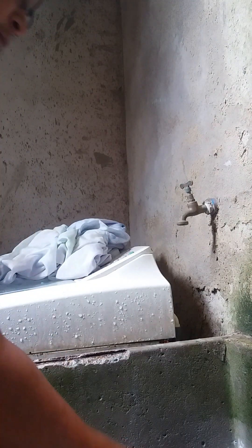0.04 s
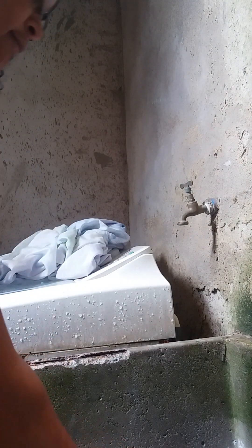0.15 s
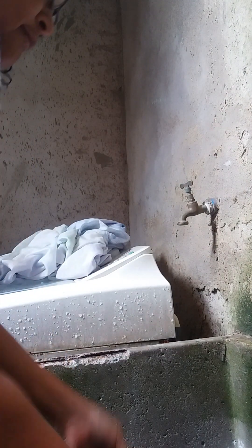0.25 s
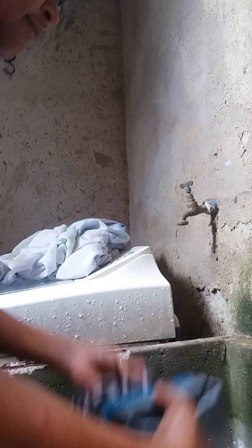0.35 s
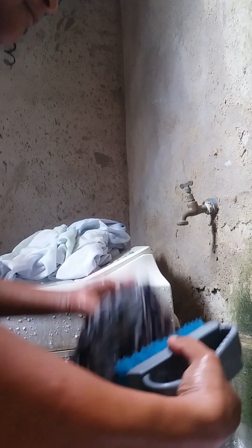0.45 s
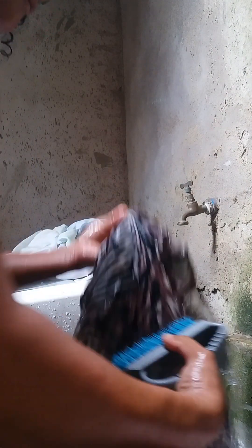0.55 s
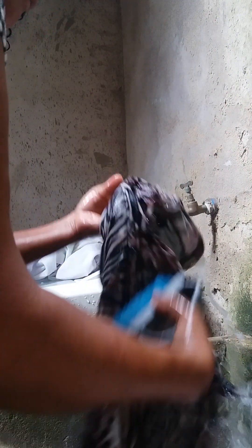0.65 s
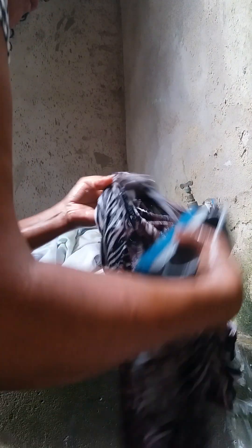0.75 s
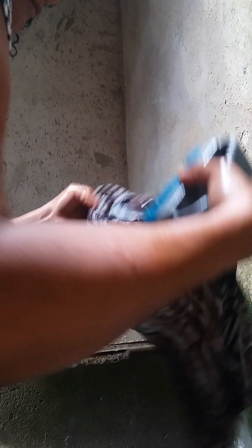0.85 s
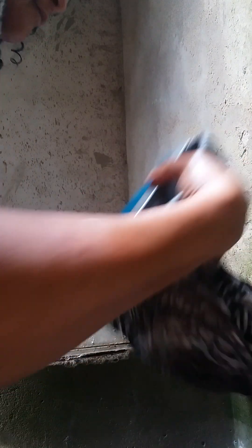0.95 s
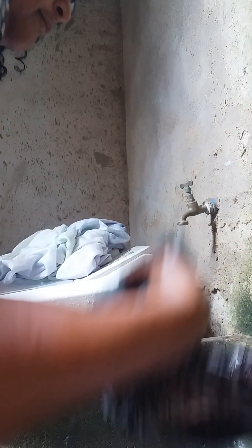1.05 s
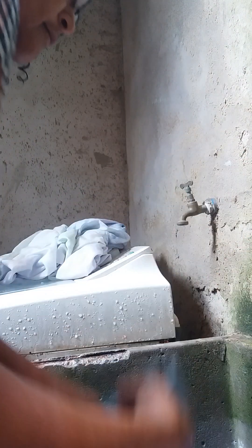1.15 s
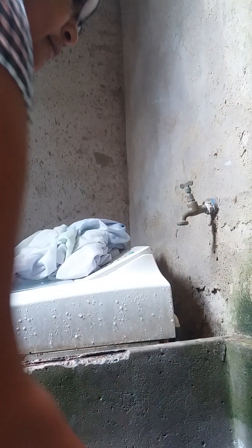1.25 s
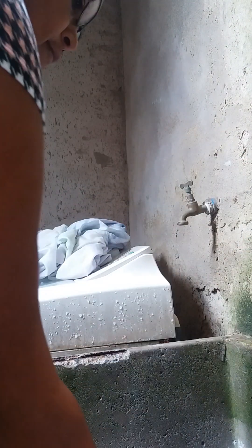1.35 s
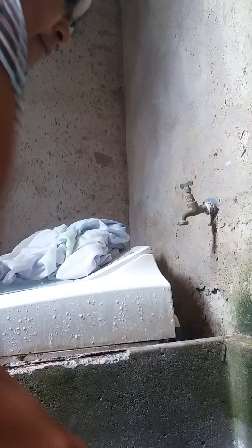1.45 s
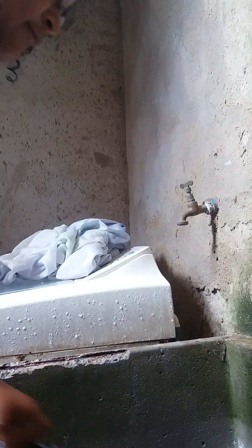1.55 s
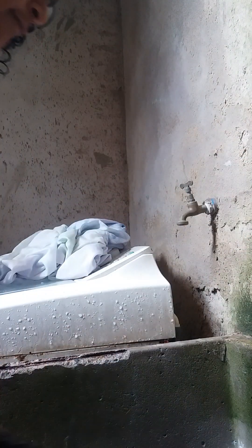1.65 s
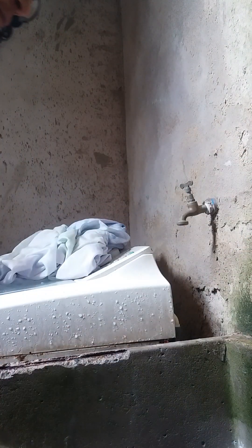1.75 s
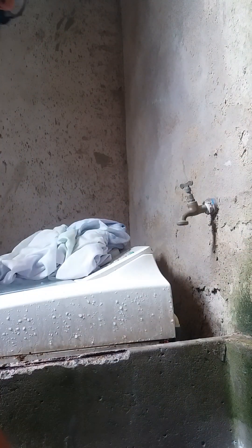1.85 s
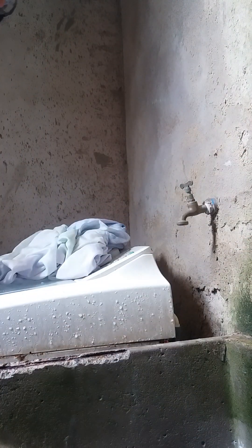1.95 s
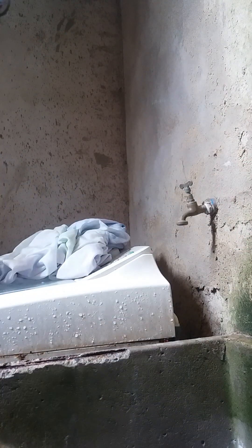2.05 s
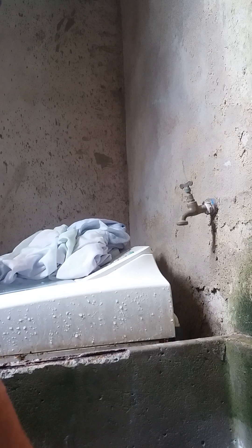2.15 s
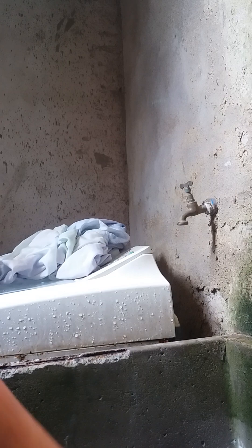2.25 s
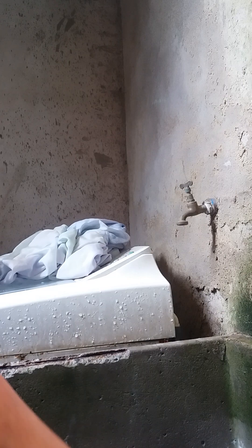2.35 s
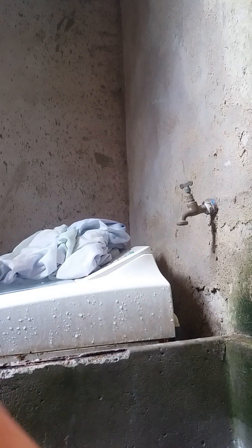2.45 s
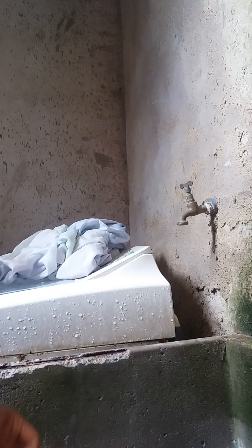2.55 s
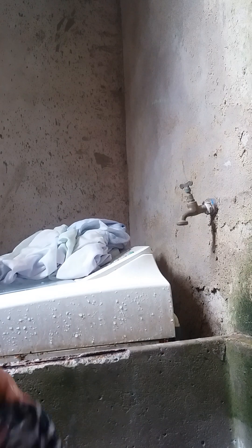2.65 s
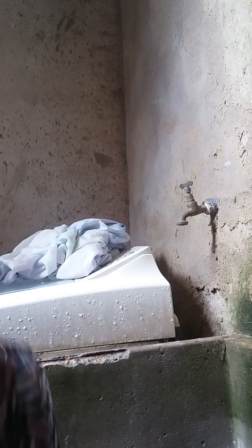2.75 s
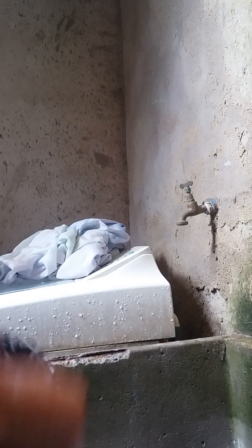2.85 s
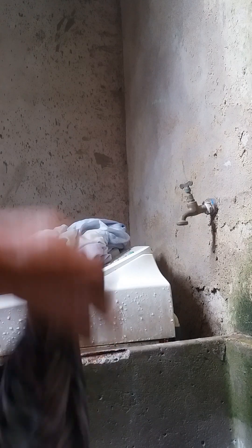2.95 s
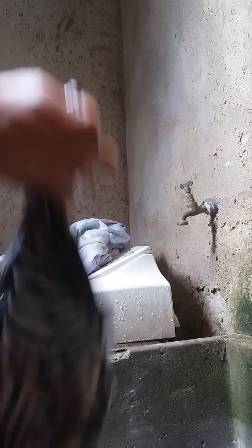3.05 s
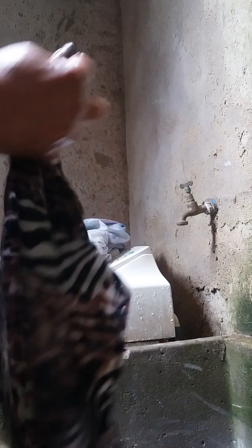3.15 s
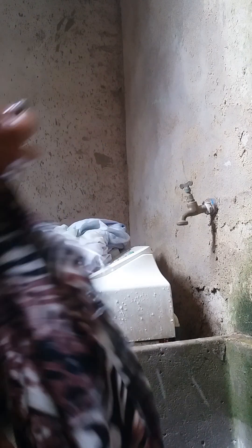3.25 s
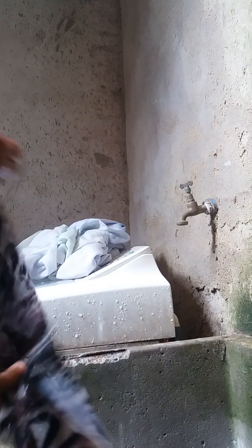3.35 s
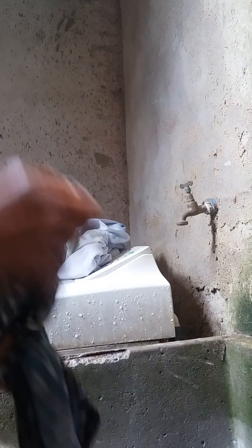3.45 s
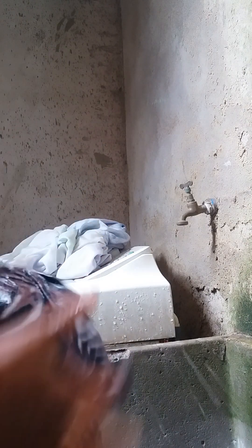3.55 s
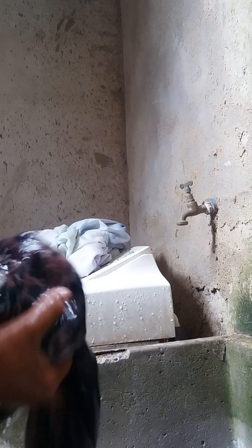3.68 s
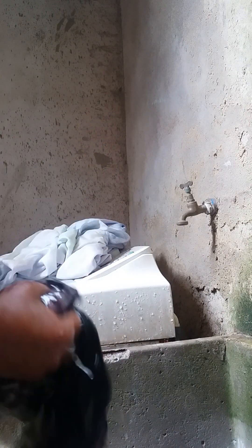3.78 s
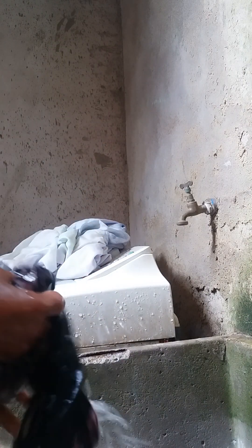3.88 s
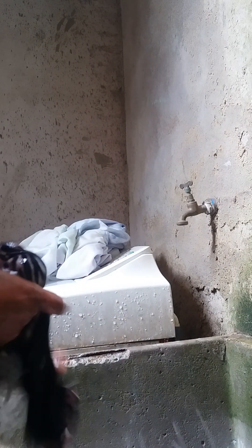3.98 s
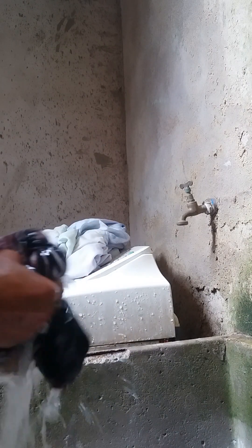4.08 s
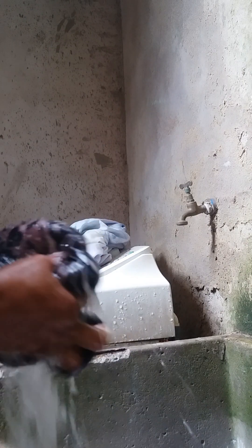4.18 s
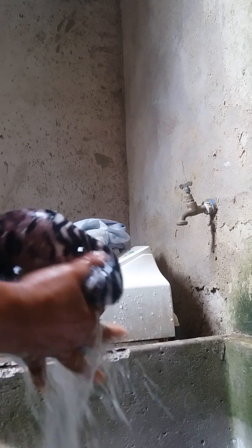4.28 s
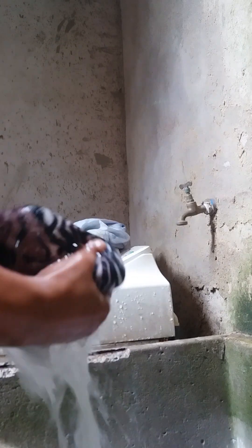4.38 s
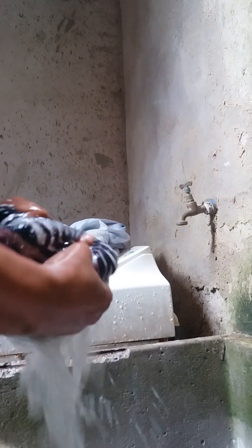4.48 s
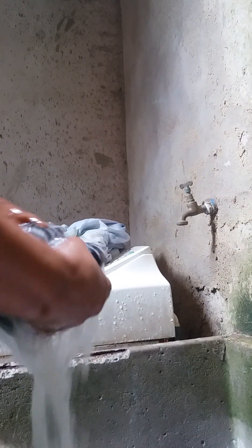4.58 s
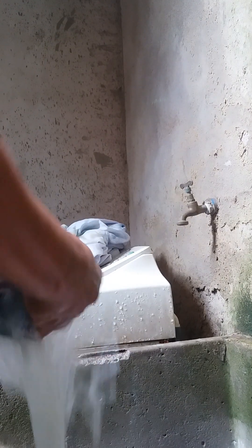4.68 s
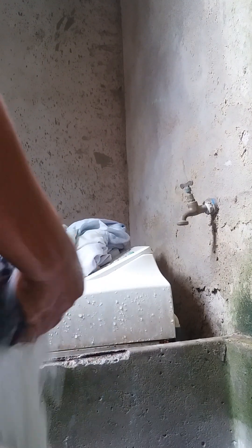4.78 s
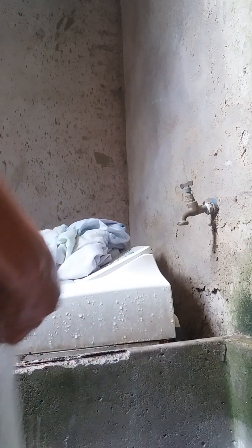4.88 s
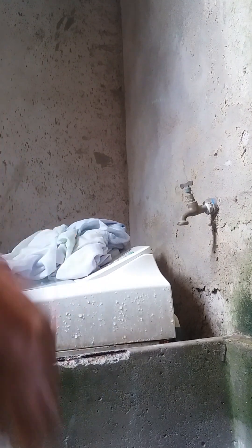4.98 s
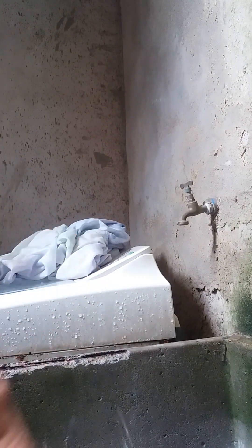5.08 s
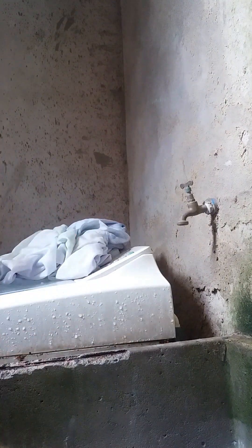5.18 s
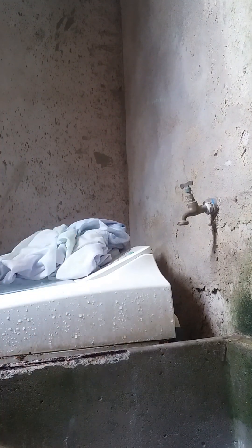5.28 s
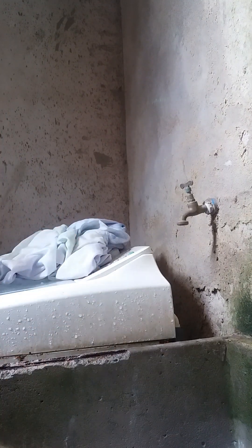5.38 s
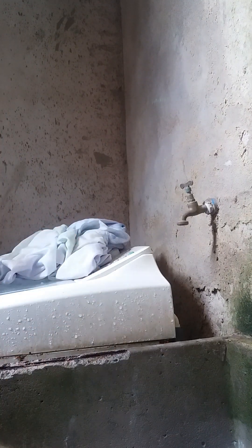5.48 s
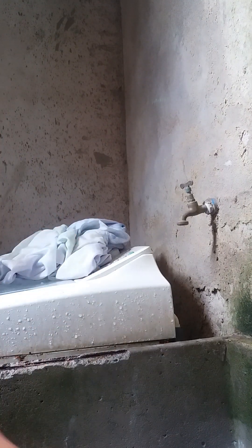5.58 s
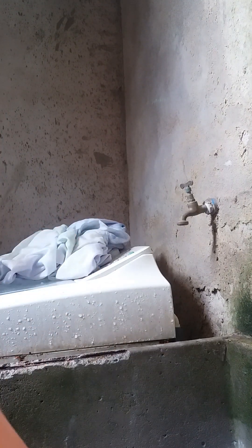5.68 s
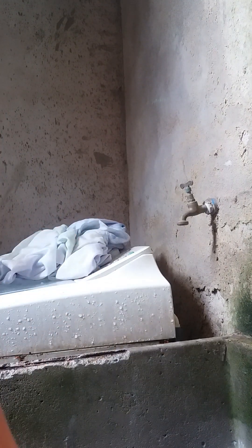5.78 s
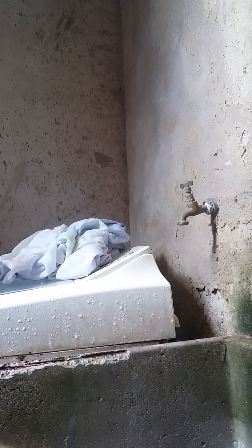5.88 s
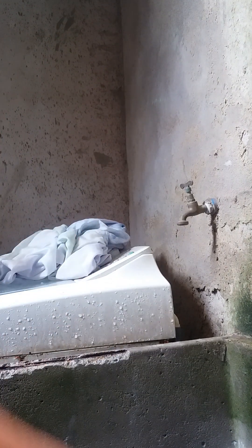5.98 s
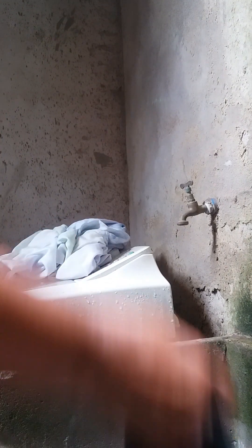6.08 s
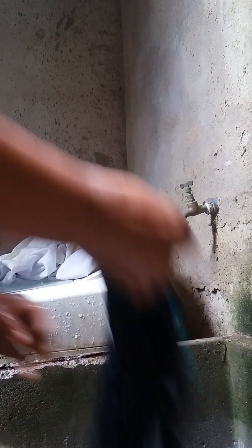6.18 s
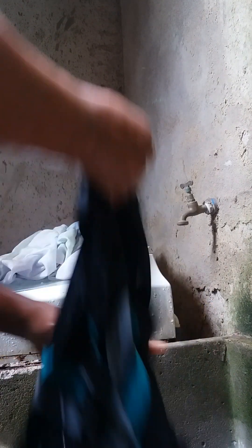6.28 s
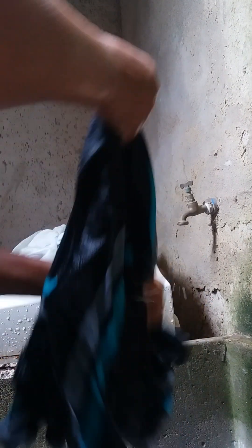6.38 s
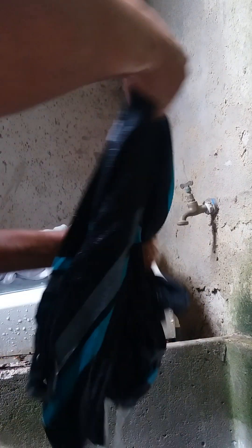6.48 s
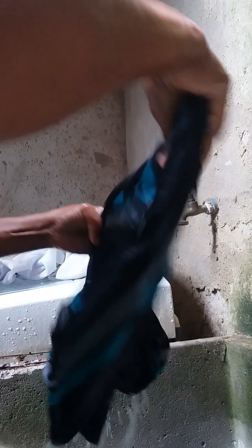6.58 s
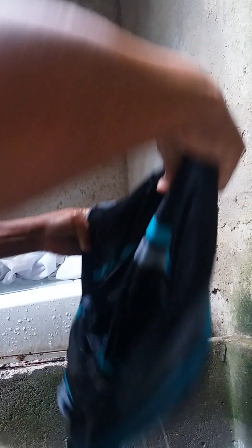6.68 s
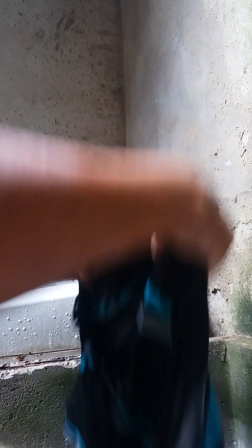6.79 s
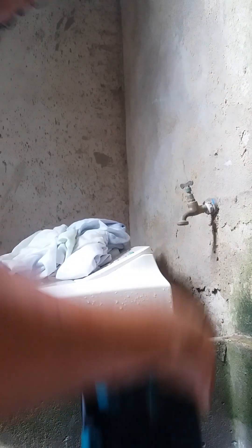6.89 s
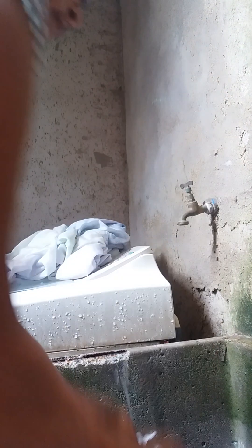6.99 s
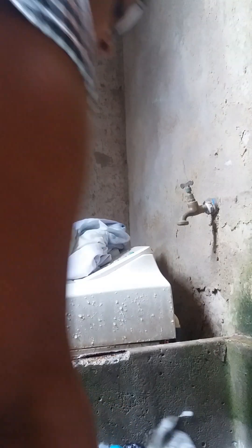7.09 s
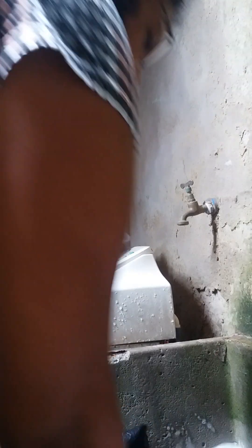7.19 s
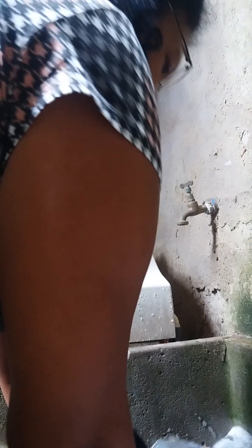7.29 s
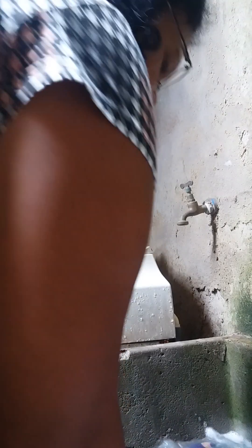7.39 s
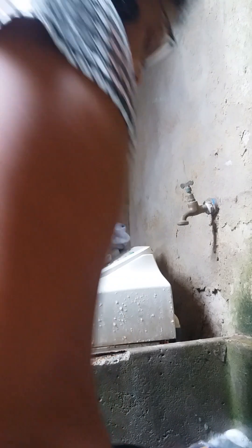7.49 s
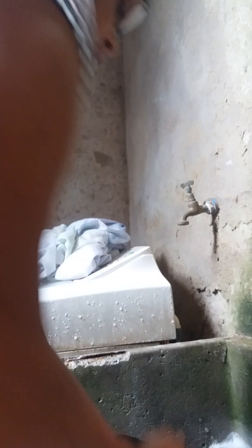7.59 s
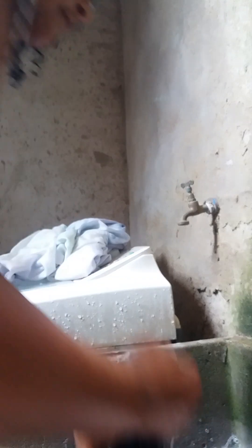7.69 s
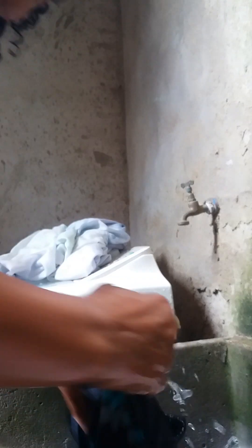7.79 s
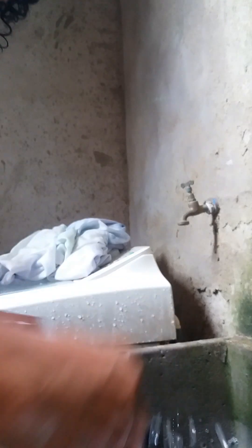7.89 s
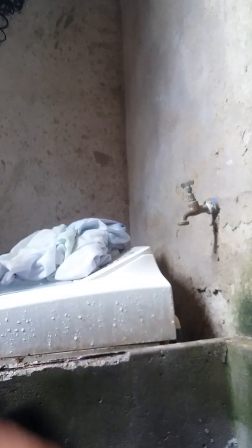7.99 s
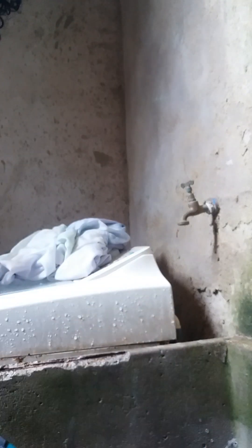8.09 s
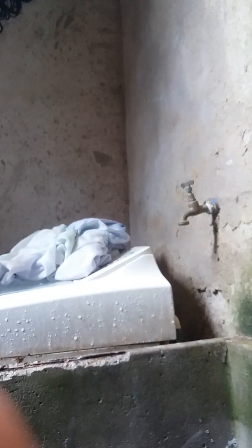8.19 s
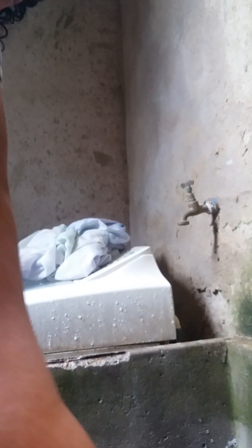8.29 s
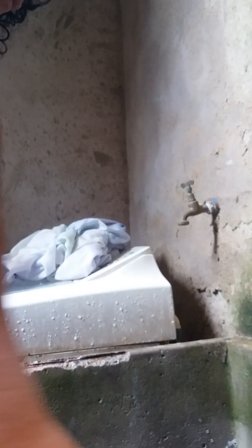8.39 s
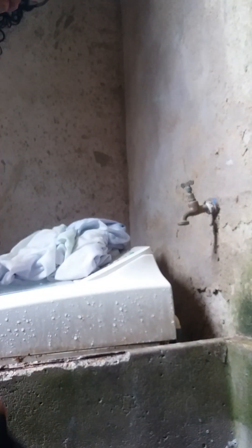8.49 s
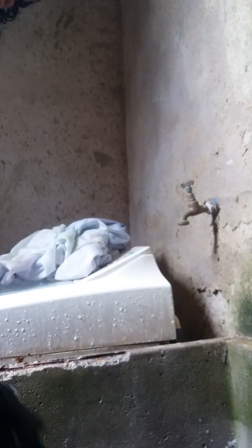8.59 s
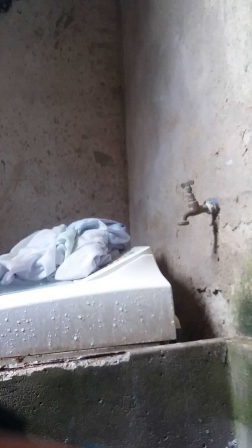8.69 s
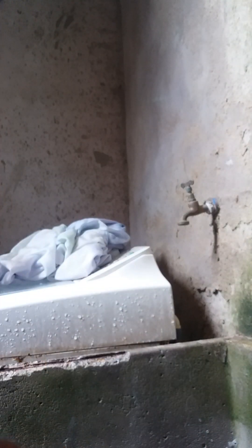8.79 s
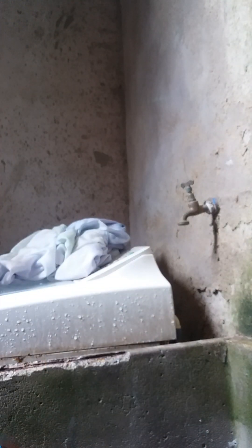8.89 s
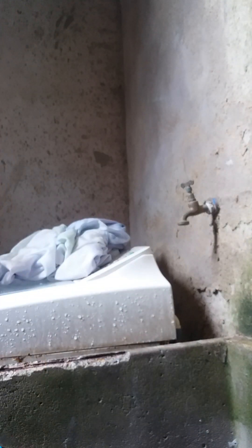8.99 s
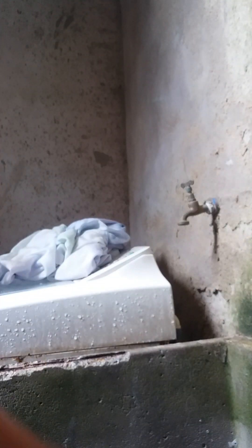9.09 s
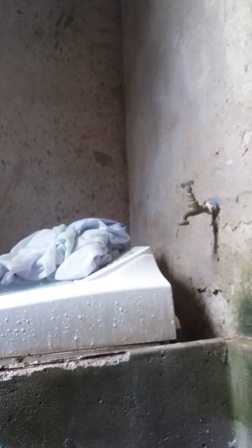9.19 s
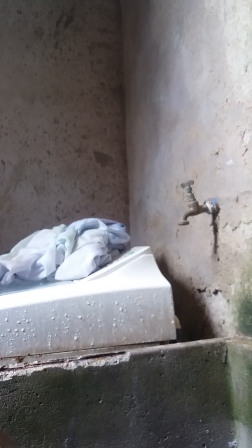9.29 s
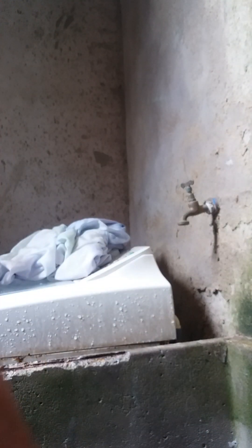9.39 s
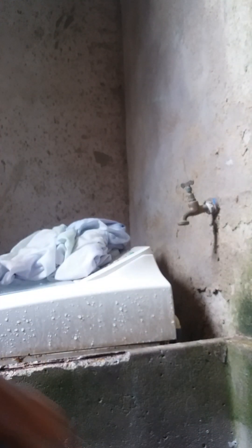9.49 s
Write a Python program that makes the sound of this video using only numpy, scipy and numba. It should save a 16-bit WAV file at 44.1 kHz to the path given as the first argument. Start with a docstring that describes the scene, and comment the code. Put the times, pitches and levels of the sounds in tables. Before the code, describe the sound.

Clothes are dunked, slapped and wrung out by hand in a concrete water tub, with irregular splashes, gurgles, plops and a short pour.

```python
"""Hand washing in a concrete tub

Clothes are dunked, lifted and wrung out by hand in a concrete laundry tub in the corner of a small room.
Strokes, slaps, gushes and a wrung-out pour drive four layers of ringing bubbles and filtered-noise froth.
Gliding sines make the plops of air pockets and the runs of glugs; bursts of noise make the drops that tick.
The tub and bare walls ring briefly through synthetic echoes, over noise for room air and a faint low hum."""
import sys
import numpy as np
from scipy import signal
from scipy.fft import rfft, irfft, next_fast_len
from scipy.io import wavfile
from scipy.ndimage import uniform_filter1d
from numba import njit

SR = 44100
rng = np.random.default_rng(int(sys.argv[2]) if len(sys.argv) > 2 else 0)


def unload_wav(signal):
    """Save mono or channel-first audio to the path in sys.argv[1] as 16-bit WAV at rate SR, clipped to [-1, 1]."""
    wavfile.write(
        sys.argv[1],
        SR,
        np.round(np.clip(np.atleast_2d(signal).T, -1, 1) * 32767).astype(np.int16),
    )


N = 420713
T = np.arange(N) / SR  # time [s]

# Every movement has a level (that of its gurgle), a depth and a brightness.
# Depth adds heave and frees larger bubbles; brightness adds patter and spray.

# hands work the cloth through the water:
# (start [s], end [s], level [dB], depth [dB], brightness [dB], growth from start to end [dB])
STROKES = [(0.133, 0.472, -44.5, -3.5, -6, 4.5), (0.443, 0.592, -40, -2, 2, -4),
           (0.63, 0.986, -47, -6, 6, -3.5), (1.29, 1.525, -55.5, 16.5, 19.5, -12.5),
           (1.557, 1.762, -43, 0.5, -2.5, -4.5), (2.068, 2.27, -29.5, -10, -8, -4),
           (2.484, 2.61, -50, -5, -12, 5), (2.737, 3.53, -47.5, 3, -3.5, 2.5),
           (3.573, 4.066, -49, 3.5, 3.5, -1.5), (5.852, 6.522, -48.5, -4.5, -2.5, 4),
           (6.54, 6.94, -53.5, 1.5, 14, 0.5), (7.044, 7.395, -42, 4, -2, 1.5),
           (7.426, 7.556, -48, 0, -3.5, 27), (7.507, 8.062, -36, -7.5, -7.5, -5),
           (8.382, 8.924, -47, -3.5, -4, -6), (8.956, 9.084, -32.5, -11, -7, -10),
           (9.28, 9.486, -33.5, -7.5, -8, 1)]
# wet cloth slaps the water: (crest time [s], fall time [s], level [dB], depth [dB], brightness [dB])
SLAPS = [(0.211, 0.022, -33.5, -3.5, -6), (0.403, 0.031, -31, -18, -21), (0.873, 0.0072, -44, -4, 14),
         (0.908, 0.0096, -42, 10, 8), (0.924, 0.0052, -30, -1.5, 7.5), (0.965, 0.0037, -34, 3, 3),
         (1.026, 0.013, -29, -1, 0.5), (1.206, 0.028, -31, 4.5, -1), (1.226, 0.039, -20.5, -1, -4),
         (1.252, 0.0037, -17, -9, -10), (1.284, 0.003, -29, -8, 11), (1.362, .007, -22, -8, -18),
         (1.792, 0.0044, -31.5, 1, 6), (2.042, 0.006, -49, -20, 23.5), (2.055, 0.0067, -23, -1.5, -8),
         (2.486, 0.02, -41, -16, -4), (2.619, 0.0029, -14, 2, -21), (2.631, 0.015, -30.5, 8.5, -26),
         (2.673, .003, -35, -5, 3.5), (2.676, 0.035, -27, 8.5, -15), (3.199, 0.023, -38, 3, -2),
         (3.399, 0.047, -30.5, -1, -4.5), (3.742, 0.017, -31, 4, 5), (4.408, .008, -35, -10, 5),
         (4.758, 0.01, -41, 11, 20.5), (5.077, 0.0054, -39, 4, 19), (5.732, 0.012, -51, -4, -22),
         (6.1, 0.0046, -60, -10, 25), (6.374, 0.0081, -38.5, -13, -1), (6.891, 0.012, -30, -15, 5),
         (6.948, 0.004, -21, 1, -8), (7.116, .006, -31.5, 16, 6.5), (7.211, .006, -36, -2, 8),
         (7.997, .007, -30.5, -6, -16), (8.076, 0.035, -17.5, 1.5, -0.5), (8.425, 0.011, -43.5, 12, 7),
         (9.037, 0.05, -25.5, -8, 4.5)]
# water gushes from the folds: (crest time [s], fall time [s], level [dB], depth [dB], brightness [dB])
GUSHES = [(0.004, 0.022, -46, 7.5, 8), (0.655, 0.061, -40.5, 7.5, -2.5), (0.73, 0.009, -32, -5, 3),
          (1.281, 0.017, -22, -4, -2.5), (1.375, 0.015, -19, -2, -9.5), (1.827, 0.025, -21.5, 1, -0.5),
          (1.856, 0.01, -10, -5, 1), (2.165, 0.056, -38.5, -13, 23.5), (2.995, 0.008, -34.5, 8.5, -8),
          (3.046, 0.026, -32.5, 6.5, -5.5), (3.468, 0.013, -29.5, -3, 5), (3.83, 0.022, -30, -0.5, -7),
          (5.772, 0.031, -33.5, 4, -17.5), (6.962, 0.036, -27.5, -4, -6), (7.0, 0.03, -23, -1.5, -4),
          (7.048, 0.026, -27, -0.5, -7.5), (7.19, 0.081, -34.5, 5, -2.5), (7.27, 0.057, -32, 5, -11),
          (7.438, 0.013, -34, -10, -3), (7.622, 0.027, -26.5, -5, 0), (7.66, 0.12, -39.5, 4, -15),
          (8.102, 0.024, -16, -11.5, 1), (8.139, 0.0041, -20, -3, 8), (8.6, 0.069, -46, -3.5, 11),
          (8.887, 0.012, -23, -2, -0.5), (8.97, 0.089, -48.5, -6, 20.5), (9.08, 0.017, -34.5, 1, 13),
          (9.409, 0.045, -31, -3.5, 17.5), (9.485, 0.013, -32, -13, 4)]
# the garment is wrung and its water pours into the tub, before lumps and drops break up the stream:
# (time [s], gurgle level [dB], patter level [dB], spray level [dB])
POUR = [(4.051, -41, -45, -58), (4.084, -32, -39.5, -58), (4.174, -34.5, -41.5, -54.5),
        (4.376, -43.5, -41.5, -46.5), (4.492, -33, -37.5, -46.5), (5.062, -42.5, -37.5, -38.5),
        (5.178, -44.5, -45.5, -44.5), (5.264, -53, -69, -66), (5.3, -73, -80, -69)]
# what sloshes on after a splash, against the splash: (heave [dB], gurgle [dB], patter [dB], spray [dB])
WAKE_SHARES = (-18, -25, -26, -26)
# bubble size classes, large to small; each bubble scales the cycles at random, a negative spread makes some weaker:
# (lowest pitch [Hz], highest pitch [Hz], cycles to the crest before scaling, size spread [dB],
#  level at which half the power merges into froth [dB])
CLOUDS = [(78.8, 360.5, 1.42, -1, -50), (345.8, 1620, 1.08, 5, -32), (1548, 4730, 1.9, 3.5, -36.5),
          (4680, 19000, 0.96, 7, -63)]
# bubbles in each size class: (heave [count], gurgle [count], patter [count], spray [count])
CLOUD_COUNTS = (1500, 5000, 12000, 4000)
# colour of the churning water: (frequency [Hz], relative density [dB per Hz])
WATER_COLOUR = [(45, -16), (100, 2.5), (170, -5), (300, -1), (580, 5), (900, -3), (1900, -13),
                (3600, -13.5), (5200, -33), (8300, -41), (10000, -46.5), (15500, -48)]
# single air pockets and drips: (start [s], peak level before the common trim [dB], starting pitch [Hz])
PLOPS = [(0.257, -26.5, 3420), (0.262, -32.5, 2030), (0.402, -26, 1840), (0.434, -39, 754),
         (0.508, -24.5, 1270), (0.521, -25, 1240), (0.543, -43, 3320), (0.701, -26.5, 573),
         (0.772, -33, 557), (1.028, -19, 673), (1.251, -20, 380), (1.269, -18.5, 860), (1.368, -14, 717),
         (1.374, -20, 2750), (1.604, -12.5, 1014), (1.809, -16, 810), (2.051, -24.5, 1300),
         (2.618, -5.5, 652), (2.619, -34.5, 3250), (2.62, -21, 1580), (2.673, -19, 835), (2.712, -41, 1520),
         (3.422, -23.5, 714), (3.45, -21.5, 630), (4.017, -26.5, 510), (4.022, -32, 2100),
         (4.057, -28, 2120), (4.094, -29, 653), (4.406, -19.5, 2720), (4.519, -22, 2750),
         (4.567, -21, 1700), (4.583, -21, 1560), (4.624, -31, 1220), (4.665, -22, 2850), (4.859, -21, 3260),
         (5.088, -18.5, 3620), (6.289, -33, 858), (6.386, -46, 2100), (6.563, -46, 2170),
         (6.601, -37.5, 2760), (6.642, -26.5, 1450), (6.699, -36, 3800), (6.798, -38, 1340),
         (6.858, -27.5, 2910), (7.245, -27, 980), (7.284, -29, 2020), (7.458, -23.5, 2000),
         (7.626, -15, 900), (7.637, -18, 810), (7.67, -13, 890), (7.813, -41, 800), (7.837, -27, 690),
         (8.265, -36, 3760), (8.424, -43, 480), (8.499, -34.5, 670), (8.677, -29.5, 3760),
         (8.817, -33, 3510), (9.034, -20, 733), (9.091, -17, 960), (9.412, -19, 596)]
# trapped air escapes in runs of like-sized bubbles:
# (start [s], end [s], level [dB], first pitch [Hz], last pitch [Hz])
GLUGS = [(0.211, 0.56, -46.5, 970, 1205), (1.612, 1.673, -40, 900, 626), (3.661, 4.01, -47, 600, 618),
         (4.06, 4.356, -45, 723, 750), (4.073, 4.213, -45, 2030, 1480), (4.296, 4.535, -45.5, 2930, 2700),
         (4.413, 4.705, -44.5, 1570, 1560), (4.471, 4.705, -44.5, 916, 590),
         (4.744, 5.098, -41.5, 3620, 3330), (4.872, 5.03, -41.5, 1810, 2630),
         (6.991, 7.056, -30.5, 563, 790), (7.13, 7.377, -47.5, 290, 324), (7.419, 7.466, -44, 1060, 820),
         (7.598, 7.712, -33.5, 1090, 890), (8.918, 9.108, -45, 3780, 3670),
         (9.052, 9.106, -32.5, 1090, 1070), (9.385, 9.431, -28.5, 577, 656)]
# resonances of the tub and its corner, before the common trim: (frequency [Hz], T60 [s], level [dB])
TUB_MODES = [(113, 0.48, -5), (170.4, 0.29, 11), (245.5, 0.53, -1.5), (603, 0.13, -3), (786, 0.19, 1.5)]
# first echoes from tub and walls, before they are dulled: (delay [s], gain against the direct sound [ratio])
ECHOES = [(0.0111, -0.15), (0.016, 0.2)]
# room decay: (frequency [Hz], T60 [s])
ROOM_T60 = [(100, 0.57), (300, 0.21), (800, 0.33), (2500, 0.13), (12000, 0.27)]
# colour of the still room air: (frequency [Hz], relative density [dB per Hz])
AIR_COLOUR = [(25, -27), (45, -15), (70, -2.5), (120, -6.5), (170, -7), (400, -20), (1200, -18.5),
              (5000, -37.5), (15500, -43.5)]

# movements
HEAVE_DB, PATTER_DB, SPRAY_DB = -9.5, -10.5, -18  # against the gurgle, at depth and brightness 0
PATTER_PER_BRIGHT = 0.69  # dB of patter per dB of brightness
STROKE_ATTACK_S, STROKE_RELEASE_S = 0.055, 0.027
GRIP_SHARE = 0.45  # share of a stroke's power that comes in jerks, as wet folds stick and peel apart
TRICKLE_DB = 3.5  # extra stroke patter from water running off the cloth
SLAP_RISE, GUSH_RISE = 0.15, 0.9  # rise time over fall time
RISE_POWER = 1.45  # above 1, a splash breaks out of the quiet with no long run-up
WAKE_S = 0.085  # time constant of the sloshing
POUR_HEAVE_DB = -15.5  # against the pour's gurgle
POUR_ONSET_S = 0.13  # the stream builds up this long before its curve starts
LUMP_DB, LUMP_COUNT = 1, 260  # unevenness of the stream; wander points over the whole scene
# bubbles
LARGE_DB, LARGE_PER_DEPTH = -7, 0.5  # large over small gurgle bubbles at depth 0; dB more per dB of depth
GURGLE_SPLIT_HZ = 800  # large gurgle bubbles lie below
MIST_HZ, MIST_PER_BRIGHT = 8600, 0.29  # edge of the finest mist; dB more above it per dB of brightness
# small, gentle plops ring for more cycles than large, violent ones
PLOP_CYCLES = 0.72  # cycles to the crest at 1 kHz and 0 dB
RING_PITCH_POWER, RING_DOUBLES_DB = 0.15, 17  # cycles grow with this power of pitch; double per step weaker
TEAR_DB, TEAR_CYCLES = -12, 1  # the snap of the surface as a plop breaks it
# smaller bubbles that each plop sheds: level, mean delay, pitch scatter, count
SATELLITE_DB, SATELLITE_LAG_S, SATELLITE_OCTAVES, SATELLITE_COUNT = -8, 0.014, 0.25, 10
GLUG_PER_S, GLUG_CYCLES = 170, 2.17  # bubble rate; cycles to the crest
GLUG_OCTAVES, GLUG_SPREAD_DB, GLUG_COUNT = 0.13, 3, 100  # scatter of pitch and of size; most bubbles in a run
# room and output
ECHO_TOP_HZ = 1740
AIR_DB, HUM_DB, HUM_HZ = -58, -56.5, 120.5  # rms levels; centre pitch of the hum
TOP_HZ = 15850


def undb(db):
    """Decibels to gain."""
    return 10 ** (np.asarray(db) / 20)


def unit(x):
    """Scale to rms 1."""
    return x / np.sqrt(np.mean(x ** 2))


def colour(x, points=None, lo_hz=1, hi_hz=SR):
    """Shape by a (Hz, dB) spectrum between steep band edges."""
    size = next_fast_len(len(x), True)
    hz = np.maximum(np.arange(size // 2 + 1) * SR / size, 1)
    gain = 1 / np.sqrt((1 + (lo_hz / hz) ** 10) * (1 + (hz / hi_hz) ** 10))
    if points is not None:
        knots, db = np.transpose(points)
        gain = gain * undb(np.interp(np.log(hz), np.log(knots), db))
    return irfft(rfft(x, size) * gain, size)[:len(x)]


def walk(count):
    """Random wander in straight lines through count random points."""
    return np.interp(T, np.linspace(0, T[-1], count), 1.064 * rng.standard_normal(count))


def shots(spread_db, decay_s, count):
    """Envelope of random tiny impacts that start at once and die away; rms 1."""
    when, luck = rng.random((count, 2)).T
    size = undb(spread_db * np.minimum(-np.log(1 - luck), 2.7))
    power = np.bincount((when * N).astype(int), size ** 2, N)
    decay = np.exp(-2 / (decay_s * SR))
    return unit(np.sqrt(signal.lfilter([1], [1, -decay], power + 1e-18)))


@njit
def bubbles(start, hz, cycles, size, glide):
    """Sines that swell and die away; a glide raises the pitch as each bubble nears the surface."""
    out = np.zeros(N)
    for k in range(len(start)):
        first = int(start[k] * SR)
        life = cycles[k] * SR / hz[k]  # samples to the crest
        phase = 0.
        for i in range(min(int(8 * life), N - first)):
            age = i / life
            phase += hz[k] * (1 + glide * age) / SR
            out[first + i] += size[k] * age * np.exp(1 - age) * np.sin(2 * np.pi * phase)
    return out


def movement_power(db, depth_db, bright_db):
    """Power that one movement puts into heave, gurgle, patter and spray, as a column."""
    heave_db = HEAVE_DB + depth_db
    patter_db = PATTER_DB + PATTER_PER_BRIGHT * bright_db
    spray_db = SPRAY_DB + bright_db
    return undb(db + np.array([heave_db, 0, patter_db, spray_db]))[:, None] ** 2


def strokes():
    """Power of the hand strokes: each sets in, grows or fades in jerks, and settles."""
    power = np.zeros((4, N))
    for start, end, *movement, growth_db in STROKES:
        near = slice(*np.searchsorted(T, [start, end + 6 * STROKE_RELEASE_S]))
        t = T[near]
        attack = np.minimum((t - start) / STROKE_ATTACK_S, 1)
        release = np.exp(-np.maximum(t - end, 0) / STROKE_RELEASE_S)
        swell = undb(growth_db * np.interp(t, [start, end], [-.5, .5]))
        power[:, near] += movement_power(*movement) * (attack * release * swell) ** 2
    power[2] *= undb(TRICKLE_DB) ** 2
    jerks = shots(spread_db=2.5, decay_s=0.013, count=900) ** 2
    power[1:] *= 1 - GRIP_SHARE + GRIP_SHARE * jerks
    return power


def splashes(table, rise_share):
    """Power of slaps or gushes: each swells to its crest and collapses."""
    power = np.zeros((4, N))
    for crest, fall, *movement in table:
        rise = rise_share * fall
        near = slice(*np.searchsorted(T, [crest - 6 * rise, crest + 6 * fall]))
        t = T[near] - crest
        drop = np.where(t < 0, np.abs(t / rise) ** RISE_POWER, t / fall)
        power[:, near] += movement_power(*movement) * np.exp(-2 * drop)
    return power


def pour():
    """Power of the wrung-out stream: lumpy gurgle at first, thinning into spray."""
    when, gurgle, patter, spray = np.transpose(POUR)
    near = slice(*np.searchsorted(T, [when[0] - POUR_ONSET_S, when[-1]]))
    power = np.zeros((4, N))
    for layer, db in enumerate((gurgle + POUR_HEAVE_DB, gurgle, patter, spray)):
        power[layer, near] = undb(np.interp(T[near], when, db)) ** 2
    power[:2] *= undb(LUMP_DB * walk(LUMP_COUNT)) ** 2
    # the stream breaks into drops that land one by one
    power[1:] *= shots(spread_db=-2.0, decay_s=0.017, count=3000) ** 2
    onset = np.clip((T - when[0]) / POUR_ONSET_S + 1, 0, 1) ** 4
    return power * onset


def wake(splash):
    """Power of the sloshing that every splash leaves behind, weakest in patter and spray."""
    keep = np.exp(-1 / (WAKE_S * SR))
    slosh = signal.lfilter([1 - keep], [1, -keep], splash + 1e-18)
    return undb(WAKE_SHARES)[:, None] ** 2 * slosh


def churn(response, flow, splash, crackle_db, splash_bubbles_db):
    """Four layers from deep heave to fine spray; the harder bubbles are driven, the more they merge into froth."""
    # the water film tears in all sizes at once
    burst = np.hypot(1, undb(crackle_db) * shots(spread_db=4, decay_s=0.002, count=2800))
    layers = []
    for layer, (lo_hz, hi_hz, cycles, spread_db, merge_db) in enumerate(CLOUDS):
        grains = cloud(lo_hz, hi_hz, cycles, spread_db, CLOUD_COUNTS[layer])
        froth = colour(rng.standard_normal(N) * burst, WATER_COLOUR, lo_hz, hi_hz)
        # equal levels as heard in the room
        grains = grains / np.std(signal.oaconvolve(grains, response))
        froth = froth / np.std(signal.oaconvolve(froth, response))
        running, gush = np.sqrt(flow[layer]), splash[layer]  # amplitude and power
        merged = running / (running + undb(merge_db))
        # in a splash no single bubble stands far above the rest
        crowded = 1 / (1 + uniform_filter1d(grains ** 2, size=220) / 2)
        splash_grains = crowded * gush * undb(splash_bubbles_db) ** 2
        separate = grains * np.sqrt(running ** 2 * (1 - merged) + splash_grains)
        layers.append(separate + froth * np.sqrt(running ** 2 * merged + gush))
    heave, gurgle, patter, spray = layers
    levels = 10 * np.log10(flow + splash)
    depth_db = levels[0] - levels[1] - HEAVE_DB
    bright_db = levels[3] - levels[1] - SPRAY_DB
    return heave + deepen(gurgle, depth_db) + patter + atomise(spray, bright_db)


def cloud(lo_hz, hi_hz, cycles, spread_db, count):
    """Separate bubbles of one size class, scattered in time, pitch, ring and strength."""
    when, pitch, ring, luck = rng.random((count, 4)).T
    hz = lo_hz * (hi_hz / lo_hz) ** pitch
    scatter = undb(spread_db * np.minimum(-np.log(1 - luck), 3.7))
    size = hz * scatter  # amplitude grows with pitch: even power per Hz
    return colour(bubbles(when * T[-1], hz, cycles * (0.075 + 2.85 * ring), size, 0.012), WATER_COLOUR)


def deepen(gurgle, depth_db):
    """Deep movements shift the gurgle towards larger bubbles, at roughly constant power."""
    large = colour(gurgle, None, 0.63, GURGLE_SPLIT_HZ)
    ratio = undb(LARGE_DB + LARGE_PER_DEPTH * depth_db)
    return (ratio * large + gurgle - large) * np.sqrt(2 / (1 + ratio ** 2))


def atomise(spray, bright_db):
    """Bright movements tear the spray finer, lifting its highest band."""
    mist = colour(spray, None, MIST_HZ)
    return spray + (undb(MIST_PER_BRIGHT * bright_db) - 1) * mist


def plops(db, glide):
    """Air pockets and drips: the surface snaps, one bubble rings, and smaller ones scatter after it."""
    start, peak_db, hz = np.array(PLOPS, float).T.copy()
    pitch_factor = (hz / 1000) ** RING_PITCH_POWER
    cycles = PLOP_CYCLES * pitch_factor * 2 ** (-peak_db / RING_DOUBLES_DB)
    size = undb(peak_db + db)
    ring = bubbles(start, hz, cycles, size, glide)
    snap = bubbles(start, hz, np.full(len(hz), TEAR_CYCLES), size * undb(TEAR_DB), 0.)
    out = ring + snap
    for late, detune in rng.random((len(PLOPS), SATELLITE_COUNT, 2)).transpose(1, 2, 0):
        lag = -np.log(1 - late)
        pitch = hz * 2 ** (SATELLITE_OCTAVES * np.sqrt(12) * (detune - .5))
        shed_size = size * undb(SATELLITE_DB) * np.exp(-lag / 2)
        out += bubbles(start + SATELLITE_LAG_S * lag, pitch, cycles / 2, shed_size, glide)
    return out


def glugs(glide):
    """Runs of bubbles pinch off at uneven intervals; their pitch drifts as the air pocket changes size."""
    out = np.zeros(N)
    for start, end, db, first_hz, last_hz in GLUGS:
        gap, detune, luck = rng.standard_normal((GLUG_COUNT, 3)).T
        when = start + np.cumsum(np.abs(gap)) * np.sqrt(np.pi / 2) / GLUG_PER_S
        hz = np.interp(when, [start, end], [first_hz, last_hz]) * 2 ** (GLUG_OCTAVES * detune)
        scatter = unit(undb(GLUG_SPREAD_DB * luck))
        # shorter bubbles overlap less, so each is made stronger
        size = undb(db) * scatter * np.sqrt(hz / (GLUG_PER_S * GLUG_CYCLES))
        live = when < end
        out += bubbles(when[live], hz[live], np.full(live.sum(), GLUG_CYCLES), size[live], glide)
    return out


def ticks(patter_power, db, lo_hz, masked_db):
    """Stray drops tick on water and concrete; their level follows the patter up to a ceiling, so a pour swallows them."""
    patter = np.minimum(np.sqrt(patter_power), undb(masked_db))
    noise = colour(rng.standard_normal(N), WATER_COLOUR, lo_hz)
    impacts = noise * shots(spread_db=3.5, decay_s=0.009, count=200)
    return unit(impacts) * patter * undb(db)


def moving(water, responses):
    """The splashing wanders round the tub, and every spot has its own pattern of echoes."""
    spot = np.cumsum(np.abs(walk(count=30))) / SR * 14
    heard = 0
    for k, response in enumerate(responses):
        # crossfade between neighbouring spots
        share = np.maximum(1 - np.abs((spot - k) % len(responses) - 1), 0)
        heard = heard + signal.oaconvolve(water * share, response)[:N]
    return heard


def room(tail_db, tub_db):
    """Impulse response: direct sound, dull first echoes, ringing tub and a short diffuse tail; energy 1."""
    t = T[:SR // 2]
    response = np.zeros(len(t))
    for delay, gain in ECHOES:
        response[int(delay * SR)] += gain
    response = signal.sosfilt(signal.butter(1, ECHO_TOP_HZ, fs=SR, output="sos"), response)
    response[0] = 1  # direct sound
    for hz, t60, db in TUB_MODES:
        damping = np.log(1000) / t60
        ring = np.exp(-damping * t) * np.cos(2 * np.pi * hz * t)
        response += undb(db + tub_db) * 2 * damping / SR * ring
    knots, t60s = np.transpose(ROOM_T60)
    for hz in 45 * 2. ** np.arange(9):  # octave bands of the tail
        damping = np.log(1000) / np.interp(np.log(hz), np.log(knots), t60s)
        band = colour(rng.standard_normal(len(t)), None, hz, 2 * hz)
        decay = np.exp(-damping * t) * np.minimum(t / 0.0064, 1)
        response += undb(tail_db) * np.sqrt(2 * damping / SR) * band * decay
    return response / np.sqrt(np.sum(response ** 2))


def background():
    """Coloured noise for still room air, and a low sine hum that wavers in pitch and level."""
    air = undb(AIR_DB) * unit(colour(rng.standard_normal(N), AIR_COLOUR))
    phase = 2 * np.pi * np.cumsum(HUM_HZ + 2.19 * walk(count=70)) / SR
    swell = undb(2.7 * walk(count=45))
    return air + undb(HUM_DB) * unit(np.sin(phase) * swell)


def scene():
    """The water, never quite still, heard through tub and room over the background."""
    responses = [room(tail_db=-8.5, tub_db=-2.5) for _ in range(5)]
    splash = splashes(SLAPS, SLAP_RISE) + splashes(GUSHES, GUSH_RISE)
    unrest = movement_power(db=-67.0, depth_db=10.5, bright_db=-20.0)
    flow = strokes() + pour() + wake(splash) + unrest
    water = churn(responses[0], flow, splash, crackle_db=-0.5, splash_bubbles_db=-4.5)
    water = water + plops(db=-1.8, glide=0.012) + glugs(glide=0.02)
    water = water + ticks(flow[2], db=-4.5, lo_hz=860, masked_db=-43.0)
    # a small pool radiates no deep bass
    water = signal.sosfilt(signal.butter(3, 80, "high", fs=SR, output="sos"), water)
    return (moving(water, responses) + background())[None]


def record(dry):
    """Thin the deepest bass, round the loudest peaks by soft saturation and cut the top steeply."""
    thin = signal.sosfilt(signal.butter(2, 35, "high", fs=SR, output="sos"), dry)
    rounded = .55 * np.tanh(thin / .55)
    return signal.sosfilt(signal.ellip(10, .2, 70, TOP_HZ, fs=SR, output="sos"), rounded)


dry = scene()
out = record(dry)
unload_wav(out)
```